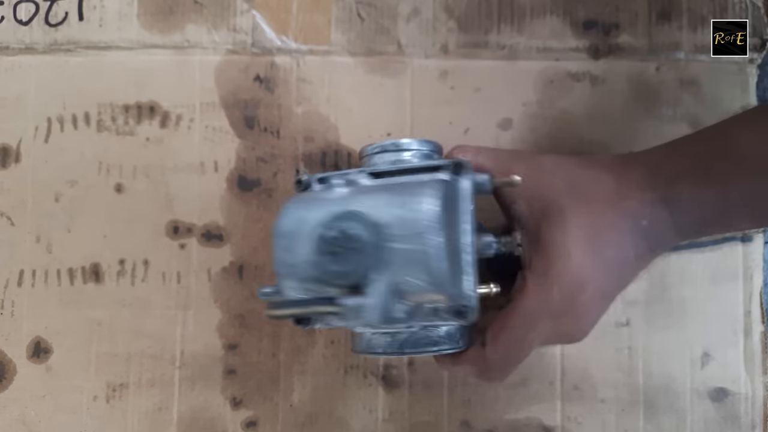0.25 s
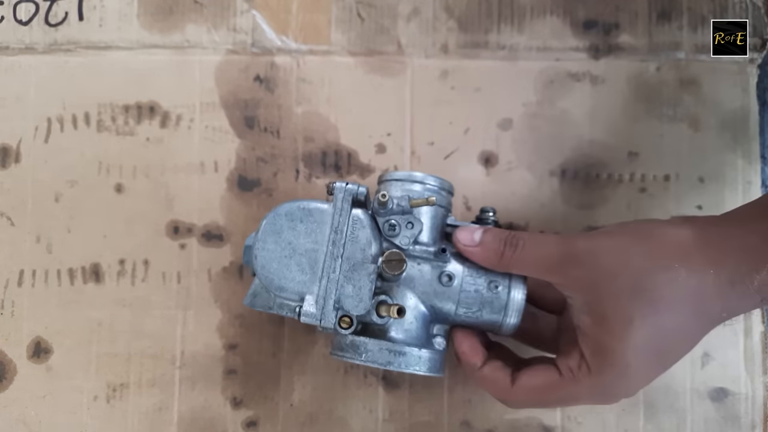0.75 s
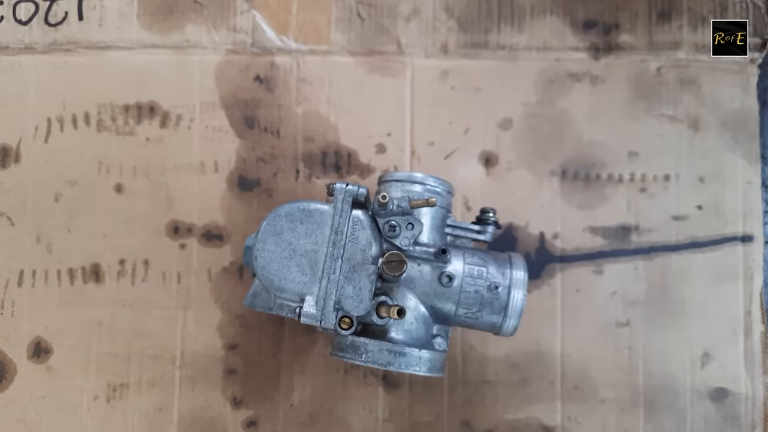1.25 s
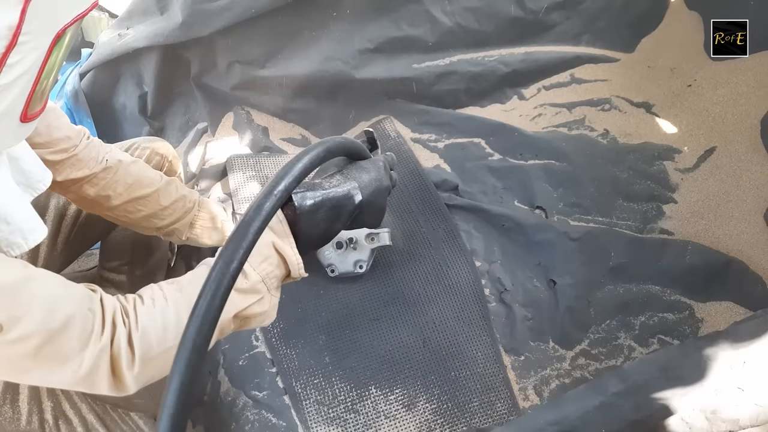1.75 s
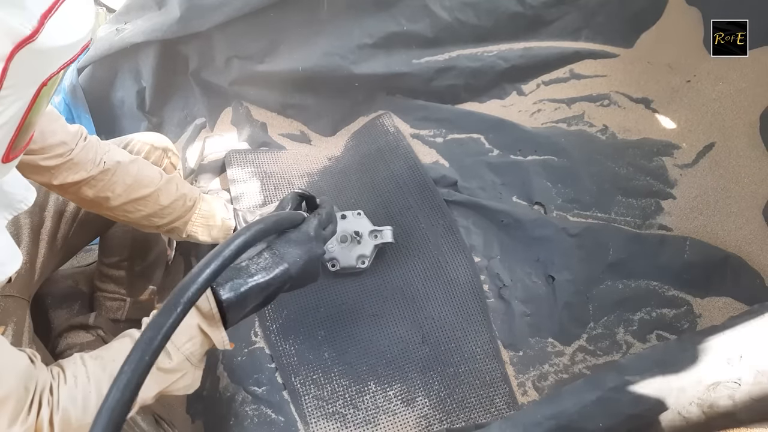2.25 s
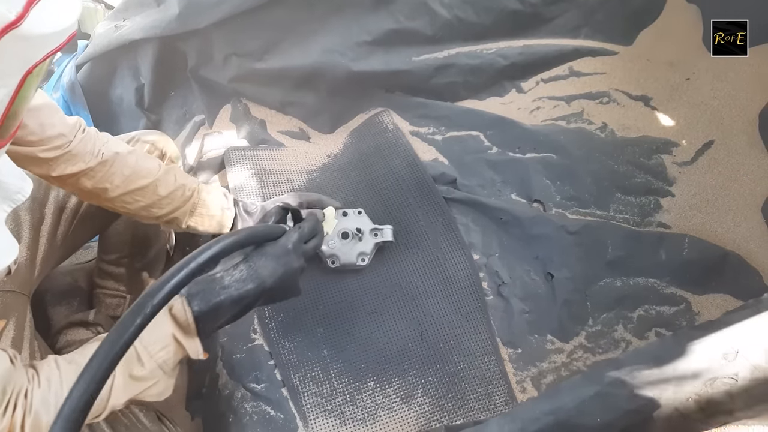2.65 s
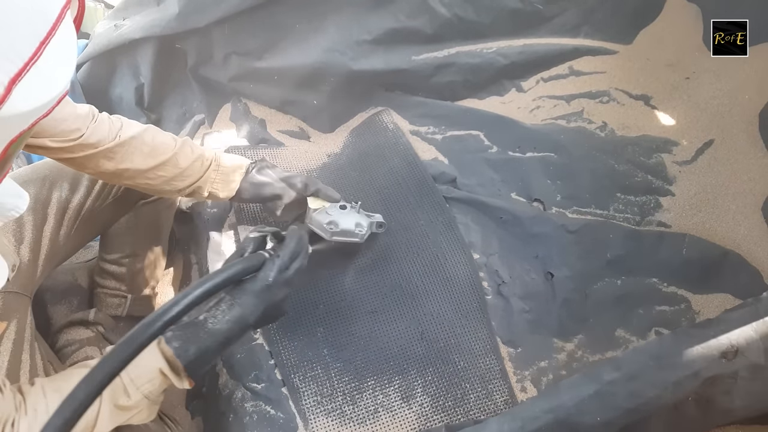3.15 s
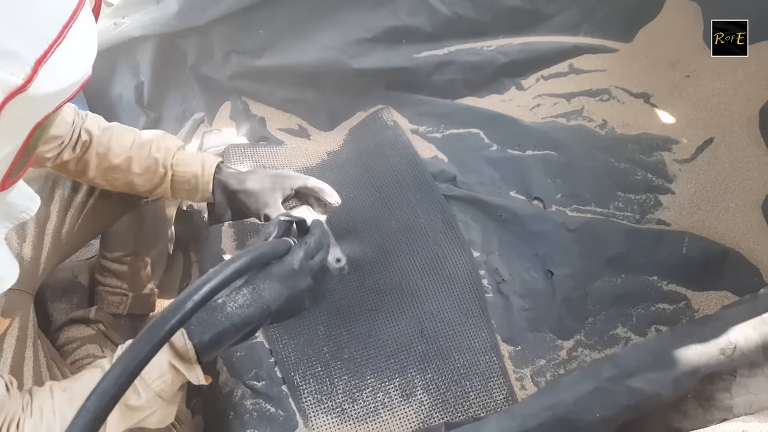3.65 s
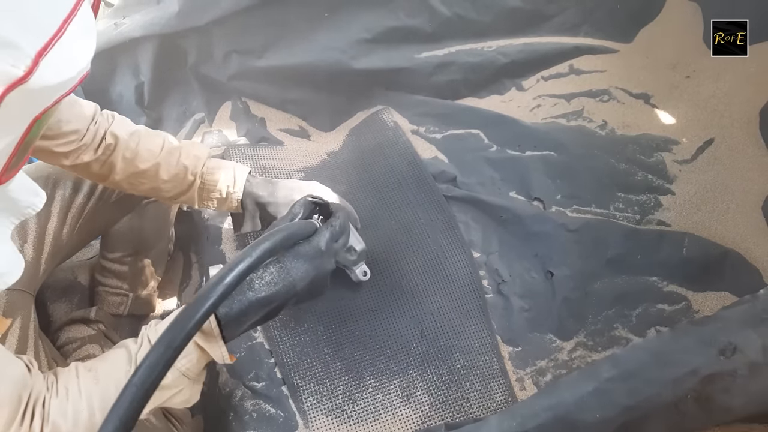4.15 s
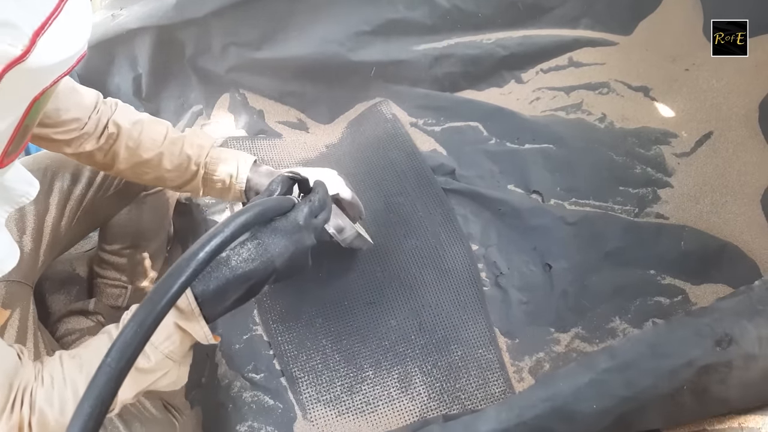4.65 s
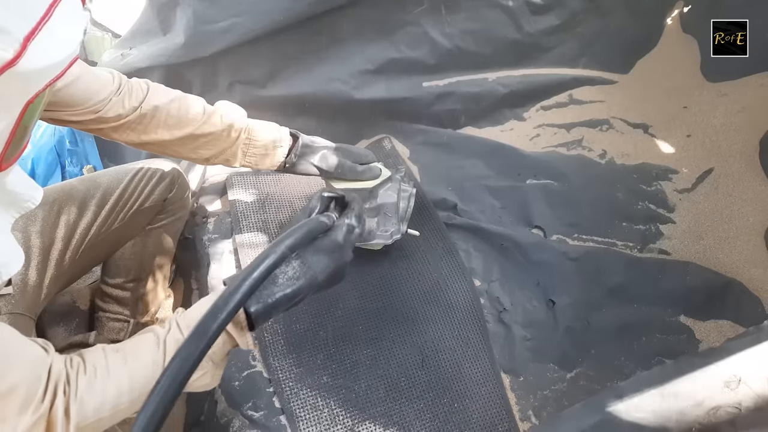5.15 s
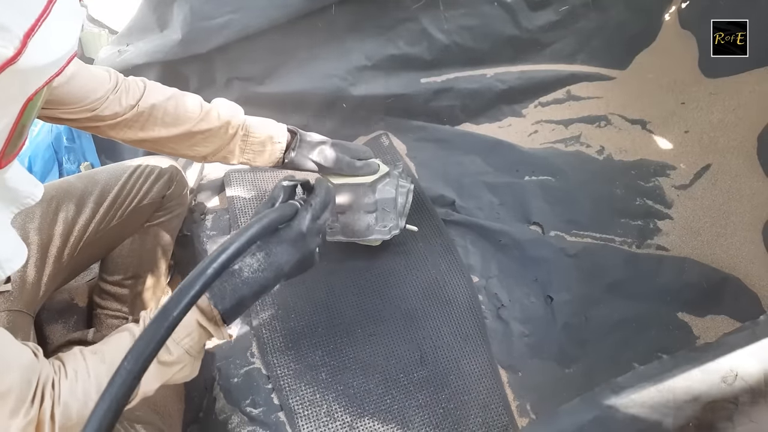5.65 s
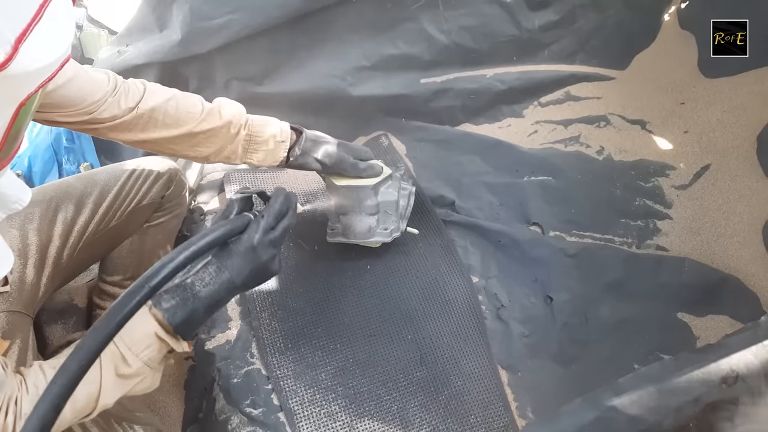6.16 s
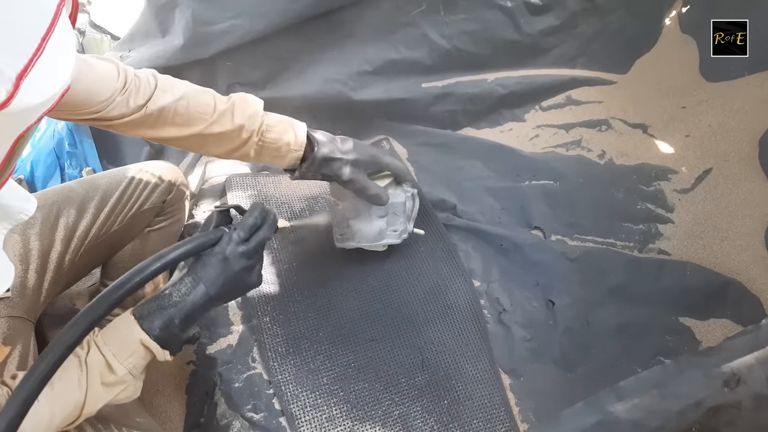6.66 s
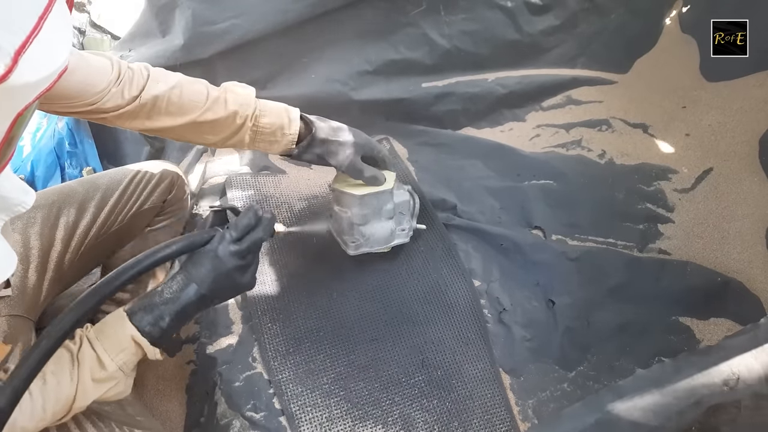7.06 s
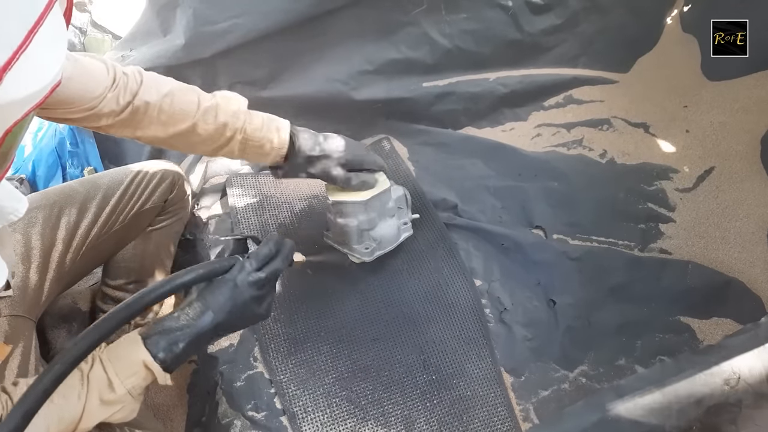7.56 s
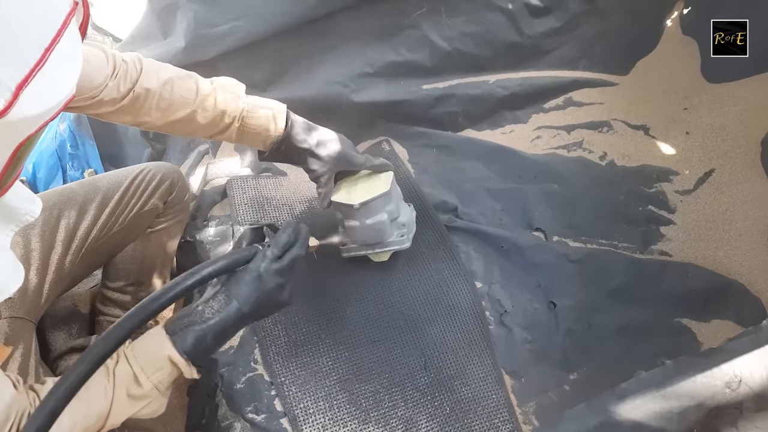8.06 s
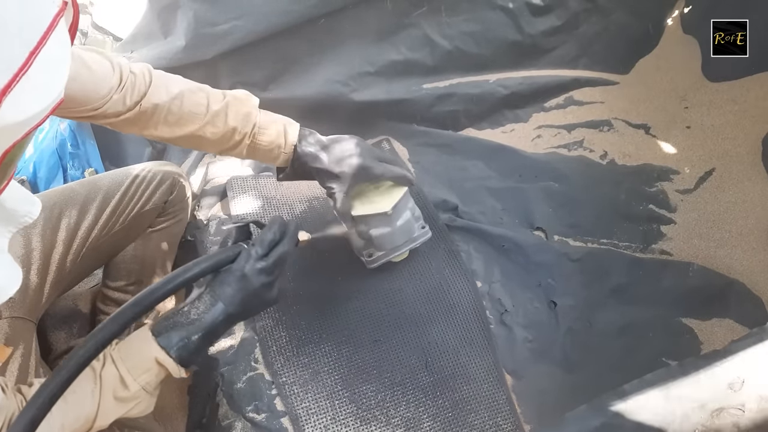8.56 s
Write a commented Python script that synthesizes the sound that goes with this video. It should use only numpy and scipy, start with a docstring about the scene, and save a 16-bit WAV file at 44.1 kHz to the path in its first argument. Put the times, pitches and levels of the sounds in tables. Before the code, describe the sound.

A metal engine part is turned and set down on cardboard with light knocks and scrapes, while faint chirps, a thin insect buzz and a distant motor hum fill an open shed. After about a second and a half, a sandblaster cuts in abruptly, close and loud. Its bright hiss continues to the end, shifting in tone as grit sweeps over metal and a mat. Stray grains pop against the left side of the microphone.

```python
"""In an open shed, a metal casting is turned and laid down on cardboard. It knocks and rubs, while
a far motor hums, something chirps and an insect buzzes. After 1.6 seconds the scene cuts to a
blasting nozzle: a jet of air hisses, and the grit it carries rings the casting and drums on the mat.
Stray grains pop on the left microphone port (its small opening), and the gain control, an automatic
volume knob, turns the sound down for a moment after loud pops."""
import sys
import numpy as np
from scipy import signal
from scipy.fft import rfft, irfft, next_fast_len
from scipy.io import wavfile
from scipy.ndimage import uniform_filter1d, map_coordinates

SR = 44100
rng = np.random.default_rng(int(sys.argv[2]) if len(sys.argv) > 2 else 0)


def transcribe(signal):
    """Save signal, clipped to [-1, 1], as a 16-bit WAV file at the path in sys.argv[1]."""
    frames = np.atleast_2d(signal).T
    limited = np.clip(frames, -1, 1)
    pcm = np.round(limited * 32767).astype(np.int16)
    wavfile.write(sys.argv[1], SR, pcm)


N = 388593
TIME_S = np.arange(N) / SR
CUT_S = 1.601  # the shed ends and the blasting begins
PAN = np.array([[.5], [-.5]])  # shares a left-over-right level between the two channels

# Levels in the tables set the balance; the functions add further gains.
# Tone colours of the air jet's three bands: pitch_hz, level_db
JET_COLOUR = [(2800, -5), (3800, -2), (4500, 1), (4900, 0), (5550, -0.5), (5850, 1.5), (6400, 0.5),
              (7200, -1.5), (8500, -13.5)]
NOZZLE_COLOUR = [(6500, -12), (7400, -2), (8500, 4), (9800, -1), (11500, -15)]
FINE_COLOUR = [(9000, -2.5), (10500, 6), (11500, 7.5), (13000, 5.5), (14500, 4), (15700, -0.5)]
# How strong those bands are: time_s, jet_db, nozzle_db, fine_db
AIR_LEVELS = [(1.62, -31.5, -28.5, -27.5), (2.44, -30.5, -30.5, -26.5), (2.92, -30.5, -29, -26.5),
              (3.22, -31, -35.5, -27), (3.3, -27.5, -33, -26.5), (3.5, -31.5, -31, -28),
              (3.7, -29.5, -28, -26.5), (3.74, -26.5, -30, -20.5), (3.8, -30.5, -33, -27.5),
              (4.08, -32, -31.5, -25), (4.62, -29.5, -31, -27.5), (5.74, -30, -32, -26),
              (5.92, -29.5, -29, -25.5), (6.48, -30.5, -31.5, -28.5), (6.54, -27, -32, -26),
              (6.62, -32, -32, -29.5), (6.78, -28.5, -30, -27), (8.24, -29.5, -31, -26),
              (8.78, -29.5, -27.5, -26), (8.8, -31, -31, -29)]
# Extra lift of the fine hiss above about 13 kHz: time_s, lift_db
TOP_LIFT = [(1.6, 4.5), (2.6, 3), (3.5, 5), (4.1, 1.5), (4.95, 6.5), (5.7, 3), (8.8, 2.5)]
# Where the blasting sits between the ears: time_s, left_over_right_db
BLAST_PAN = [(1.6, -1), (4.1, -1.2), (6.5, 0), (8.8, 0)]
# The blasting briefly dips in volume, mostly just after loud pops: time_s, width_s, change_db
BLAST_DIPS = [(3.75, 0.027, -7), (6.3, 0.015, -0.5), (6.47, 0.022, -1.5), (6.64, 0.026, -1),
              (7.18, 0.014, -3.5), (7.77, .03, -1), (8.31, 0.018, -3.5)]
# Tone colours of grit on metal, grit on the mat and the low rumble: pitch_hz, level_db
METAL_COLOUR = [(900, -9.5), (1200, -9), (1450, -1), (1900, -0.5), (2450, -4), (3000, -4.5), (4000, -5.5),
                (4800, -11.5)]
MAT_COLOUR = [(380, -55), (440, -5.5), (510, -0.5), (700, 1), (950, -1), (1100, -6.5), (1350, -5.5),
              (1700, -25)]
RUMBLE_COLOUR = [(20, 15.5), (80, -10), (150, -4.5), (250, -0.5), (420, 0.5), (520, -56)]
# Pitches that the grit sets ringing in the casting and the mat: pitch_hz, width_hz, strength_db
CASTING_PEAKS = [(1500, 140, -4), (2050, 140, -3), (2287, 130, -.5), (2690, 130, 0), (3050, 130, -1.5),
                 (3390, 160, 0), (3940, 120, -5)]
MAT_PEAKS = [(508, 120, -1.5)]
# Slow changes in where the stream lands: time_s, metal_db, mat_db
GRIT_LEVELS = [(1.78, -32, -39), (2.8, -30, -38), (3.38, -27, -43), (3.77, -30, -37.5), (4.81, -34, -34.5),
               (5.1, -32, -36.5), (6.12, -35, -35.5), (6.47, -33.5, -38.5), (7.16, -33.5, -36),
               (7.59, -31, -36), (7.96, -32.5, -34.5), (8.45, -33.5, -38), (8.8, -33.5, -36)]
# Lifts as the stream sweeps across: time_s, width_s, metal_db, large_hollow_db, small_hollow_db, mat_db
STREAM_SWEEPS = [(1.67, 0.078, 5.5, 7, -4, 2), (1.93, 0.13, 2, 12, 7, -1), (2.17, 0.074, -1, .1, -3, 2.5),
                 (2.5, 0.081, 0.5, 18, -3, 4.5), (2.59, 0.04, 0.5, 8.1, 5, -3), (2.99, 0.16, -1, 4, 12, 4),
                 (3.08, 0.057, 0.5, 6.2, 6, -3), (3.17, 0.03, 1.5, 12, 13, -2),
                 (3.27, 0.051, 2, 8, 10.5, 1), (3.34, 0.1, -2, 12, 16.5, 4.5), (3.55, 0.13, 1, 9.4, 16, 1),
                 (3.7, 0.016, 4, 1, 8, -1), (3.81, 0.04, 3, 6.8, 14, 1), (3.92, 0.077, 1, 6.1, 8, -3),
                 (4.03, 0.05, 4.5, 12, -2, -2), (4.21, 0.063, 6, 13, 2, -3.5),
                 (4.32, 0.056, 3.2, 8, -1, -5), (4.44, 0.053, 4.5, 14, 2, -4.5),
                 (4.6, 0.065, 4, 10, 2, 0.5), (4.74, 0.15, 5, 5.6, 7, -5.5), (4.9, 0.095, 3, 13, -7, 0.5),
                 (5.55, 0.096, 1, .1, 6, -3), (5.78, 0.054, 4.5, 8.6, -2, 2.5),
                 (6.02, 0.074, 8, 6.3, 0, -1), (6.27, 0.044, 3, 8.1, -4, 3.5), (6.53, 0.028, 3, 13, 13, 0),
                 (6.78, 0.23, 1, 1, 1, 1.5), (7.04, 0.023, 3, 9, -1, 7), (7.24, 0.038, 1.5, 10, -7, 4.5),
                 (7.34, 0.022, 2.5, 9.9, -4, -0.5), (7.7, 0.076, 0, 8.4, 5, -3),
                 (8.45, 0.033, 3, 17.5, 3, 5)]
# The stream glances off an edge and flares up: time_s, width_s, pitch_hz, width_hz, level_db
EDGE_FLARES = [(1.69, .05, 2330, 300, -34), (1.9, .03, 2270, 250, -33), (2.0, .03, 2300, 400, -32),
               (2.07, 0.028, 2700, 250, -38), (3.1, 0.044, 3220, 400, -29), (3.3, 0.064, 3400, 500, -29),
               (3.3, .04, 2050, 250, -31), (3.44, .03, 2250, 200, -34), (3.48, 0.049, 3300, 600, -31),
               (3.51, 0.044, 1500, 200, -35), (3.64, 0.057, 4020, 600, -29.5),
               (3.83, 0.039, 2030, 250, -34), (4.02, 0.036, 3950, 500, -30.5), (4.87, 0.04, 2100, 450, -31),
               (5.56, .025, 3530, 400, -34), (5.77, 0.047, 1510, 200, -38), (6.03, 0.051, 3570, 500, -31),
               (6.04, 0.034, 4250, 400, -30), (6.53, 0.024, 1520, 300, -30), (6.54, 0.031, 3700, 600, -29),
               (7.01, .03, 4000, 300, -38), (7.015, 0.016, 604, 250, -30), (7.043, 0.01, 840, 250, -30),
               (7.22, 0.025, 520, 150, -35), (7.233, .012, 785, 150, -29), (7.69, 0.026, 4100, 400, -32),
               (8.26, 0.028, 4080, 300, -32), (8.34, 0.072, 3320, 200, -36), (8.44, .04, 3800, 400, -33),
               (8.46, .04, 2830, 300, -39), (8.62, 0.034, 1550, 250, -33)]
# Large hollow, small hollow and nozzle whistle: pitch_hz, width_hz, flutter_db, flutters_per_s
HOLLOWS = [(1690, 120, 1.5, 27), (2750, 380, 2, 40), (4660, 70, 2.5, 30)]
# The nozzle's faint whistle grows louder in bursts: time_s, width_s, lift_db
WHISTLE_BURSTS = [(4.22, .06, 5), (5.8, .04, 8), (6.25, .06, 6), (6.76, .08, 8), (6.9, .1, 11),
                  (7.06, .09, 9), (7.24, .09, 13), (7.5, .07, 11), (7.66, .07, 11), (7.98, .07, 10),
                  (8.45, .1, 9), (8.73, .05, 8)]
# Grains hit the left port: time_s, thump_db, tick_db
GRAIN_HITS = [(1.724, -50, -3.5), (2.106, -20, -3), (2.276, -53, -10), (2.491, -47, -12), (2.74, -51, -7),
              (2.903, -47, -4), (3.0778, -39, -0.5), (3.114, -26, -10), (3.133, -17, -19),
              (3.1987, -13, -1.5), (3.731, -20, -13), (4.5201, -45, -17), (4.563, -45, 3.5),
              (4.683, -46, -6), (4.8875, -22, -2), (5.9174, -42, 0), (6.255, -44, 0.5), (6.287, 1, -5),
              (6.8113, -21, -19), (6.9803, -48, -7), (7.154, -38, -8), (7.175, -14.5, -8),
              (7.193, -38, -1.5), (7.28, -47, -11), (7.345, -44, -5), (7.3816, -1.5, -5.5),
              (7.5916, -20, -14), (7.6892, -17, -12), (8.133, -32, -8), (8.3042, -19, -11),
              (8.3182, -6, -2), (8.5897, -19, -9), (8.7485, -48, -10)]

# The casting touches the cardboard; each touch favours one pitch in the casting and one in the board:
# start_s, board_db, casting_db, crack_db, casting_pitch_hz, board_pitch_hz
TOUCHES = [(0.059, -41, -64, -55, 700, 300), (0.31, -47, -60, -50, 700, 300),
           (0.378, -67, -52, -50, 2400, 300), (0.4119, -24.5, -38, -40, 850, 400),
           (0.417, -22, -47, -55, 1000, 249), (.428, -29, -36, -53, 660, 400),
           (.441, -38, -33.5, -62, 660, 250), (.455, -36, -44, -62, 800, 250),
           (0.529, -56, -35, -47, 1450, 500), (.533, -58, -36, -56, 1200, 400),
           (0.5565, -38, -40, -58, 850, 500), (.646, -44, -38, -55, 1000, 550),
           (0.6643, -20.5, -29, -28, 1000, 450), (0.673, -30, -47, -50, 1000, 250),
           (0.688, -26, -35, -40, 1000, 350), (.694, -28, -42, -55, 800, 230),
           (0.729, -37, -43, -46, 780, 620), (0.7696, -27.5, -35.5, -35.5, 1320, 590),
           (.775, -42, -55, -60, 750, 220), (.894, -47, -46, -55, 1700, 300),
           (0.937, -67, -55, -57, 1500, 300), (1.0946, -44, -33, -43, 1430, 700)]
# Notes of the knocked cardboard and casting: pitch_hz, level_db, ring_s (time to fade by 60 dB)
BOARD_NOTES = [(165, -17, 0.049), (246, 2.5, 0.055), (418, -0.5, 0.057), (600, 4, 0.018)]
CASTING_NOTES = [(655, 1, 0.09), (790, -3, 0.035), (1000, 0, 0.07), (1175, 0, 0.04), (1390, -2, .03),
                 (1720, 2, 0.022), (2400, 0, .018)]
# The casting slides over the cardboard: peak_s, rise_s, fall_s, thud_db, rub_db, scuff_db, rustle_db
SLIDES = [(0.056, 0.017, 0.11, -56, -55, -55, -51), (0.296, 0.064, 0.076, -55.5, -57, -51.5, -46),
          (0.416, 0.0033, 0.079, -33.5, -48, -69, -68), (0.528, .035, 0.11, -48, -51, -56, -50),
          (0.61, 0.038, 0.16, -49, -58, -47, -66), (0.664, 0.1, 0.037, -43, -43, -40, -47),
          (0.695, 0.023, .04, -42, -47, -61, -70), (0.776, 0.16, 0.13, -43, -56, -63, -75),
          (0.93, 0.075, 0.033, -55, -58, -61, -59), (1.098, 0.0066, 0.05, -51, -53, -57, -76),
          (1.24, 0.051, 0.047, -57, -56, -69, -84), (1.482, 0.044, 0.11, -55, -57, -68, -61),
          (1.59, 0.06, .05, -53.5, -80.5, -75.5, -63)]
# The quiet between slides: thud_db, rub_db, scuff_db, rustle_db
QUIET_DB = [-59.5, -65.5, -74, -76]
# Tone colours of the four sliding noises, low to high: pitch_hz, level_db
THUD_COLOUR = [(50, -10), (120, 1), (200, 5), (400, 0.5), (900, -6.5), (1500, -50)]
RUB_COLOUR = [(600, -26), (900, 6.5), (1300, 11), (2000, 9), (2800, 2), (3600, -8)]
SCUFF_COLOUR = [(2000, -22), (3000, 8), (4500, 4), (7000, 1), (10000, -15), (12500, -29)]
RUSTLE_COLOUR = [(7000, -6), (10000, 1), (12000, -4), (16500, -2)]
# Nearby chirps and thin squeaks:
# start_s, length_s, first_pitch_hz, held_pitch_hz, level_db, swell_share (of the length), wobble_hz
CALLS = [(0.028, .045, 1130, 1220, -51, .5, 15), (0.068, .06, 1330, 1330, -55, .2, 70),
         (0.225, .055, 12000, 12000, -60, .6, 45), (0.245, .042, 1950, 2190, -45, .5, 30),
         (0.225, .05, 13300, 13400, -64, .5, 45), (0.225, .04, 1350, 1480, -62, .4, 60),
         (0.255, .07, 13900, 14800, -58, .4, 45), (0.316, .011, 2200, 2080, -39, .45, 20),
         (0.326, .036, 1950, 2050, -50, .2, 45), (0.378, .012, 12600, 12400, -60, .3, 150),
         (0.385, .025, 9600, 9600, -66, .3, 45), (0.502, .045, 10000, 9950, -62, .4, 90),
         (0.515, .03, 11600, 11400, -65, .4, 120), (0.575, .035, 10100, 10000, -64, .6, 90),
         (0.76, .015, 13800, 13400, -62, .5, 150), (1.42, .045, 13700, 14000, -73, .6, 60),
         (1.478, .02, 11900, 11700, -65, .4, 90), (0.487, .042, 1980, 2200, -56, .5, 40),
         (0.564, .066, 1385, 1390, -43, .55, 5), (0.665, .06, 10000, 9800, -57, .2, 130),
         (0.705, .06, 2370, 2370, -63, .5, 25), (0.78, .055, 1720, 1730, -60, .4, 25),
         (0.84, .065, 1790, 1990, -62, .7, 20), (0.905, .045, 12500, 11900, -65, .3, 45),
         (0.915, .05, 2150, 2145, -61, .45, 20), (0.93, .04, 1180, 1190, -64, .4, 20),
         (1.05, .05, 12100, 12350, -68, .4, 45), (1.072, .03, 1396, 1396, -53, .4, 30),
         (1.192, .05, 1130, 1420, -46, .7, 8), (1.196, .02, 1150, 1270, -53, .3, 8),
         (1.23, .078, 1430, 1450, -49, .55, 12), (1.196, .045, 2300, 2450, -57, .45, 50),
         (1.195, .04, 4700, 4900, -68, .3, 45), (1.35, .11, 2480, 2420, -69, .6, 30),
         (1.455, .035, 1600, 1760, -62, .6, 40), (1.222, .045, 2900, 2950, -66, .5, 30),
         (1.45, .15, 1225, 1220, -65, .4, 10), (1.455, .04, 13100, 11700, -69, .5, 45),
         (1.54, .06, 2420, 2430, -66, .5, 15), (1.57, .03, 12700, 13100, -65, .5, 45)]
# Lower callers sit left, higher ones right: pitch_hz, left_over_right_db
CALL_PAN = [(1200, 9), (1600, 16), (2100, -7.5), (12000, -11)]
# Tones of the far motor: pitch_hz, level_db
MOTOR_TONES = [(151.5, -49), (210, -54.5), (285, -59.5), (305, -66), (339, -62), (400, -67)]
# The hum swells: time_s, change_db
MOTOR_SWELL = [(0, -33), (0.6, -19), (1.0, -13), (1.3, -5), (1.6, -6)]
# Tone colour of the insect: pitch_hz, level_db
INSECT_COLOUR = [(7000, -14), (8000, 0), (9000, 0), (10300, 4), (11000, -7), (11600, -30)]
# The insect's buzzes: start_s
BUZZ_STARTS = [0.0, .148, .29, .428, .575, .718, .872, 1.018, 1.158, 1.3, 1.437, 1.575]

# How alike the noise is in both ears: pitch_hz, likeness (0 unrelated, 1 the same)
BLAST_ALIKE = [(60, 0.26), (99, 0.23), (160, 0.62), (270, 0.63), (450, 0.95), (740, 0.92), (1220, 0.77),
               (2010, 1), (3330, 0.51), (5500, 0.3), (9080, 0.51), (15000, 0.23)]
SHED_ALIKE = [(60, 0.98), (180, 0.89), (550, 0.69), (1650, 0.21), (4970, 0.11), (15000, 0.04)]
# Which side the noise leans to: pitch_hz, left_over_right_db
BLAST_BALANCE = [(60, 14.5), (87, -1), (130, -1.5), (180, -2), (260, 0.5), (380, 0), (550, 1.5), (790, 1.5),
                 (1140, 5), (1650, 3.5), (2380, 1.0), (3440, 1.5), (4970, 1), (7180, -1.5), (10400, -0.5),
                 (15000, 3)]
SHED_BALANCE = [(60, 8), (180, 4), (550, 3), (1650, 1), (4970, -6), (15000, -4)]
# How far the left wave runs ahead of the right: pitch_hz, lead_radians
BLAST_LEAD = [(0, -0.46), (1120, 0.28), (2070, -0.77), (2410, -1.4), (3010, -0.56), (3270, 0.52),
              (4310, -0.95), (4740, -1.1), (5860, -0.96), (6370, 0.37), (8960, -0.33), (11800, 1),
              (12800, -0.59), (14000, -0.2), (15000, -0.8), (16500, -2.3)]


def blasting():
    """Air and grit leave the nozzle in uneven surges; the volume also dips briefly at set times."""
    stream = air_jet() + grit() + rumble()
    breath = hiss([(300, 0), (16000, 0)], flicker_db=0, rate=1, bands=1)
    stream = stream + edge_flares(breath) + hollows(breath)
    surge_db = 0.79 * drift(51) + 0.36 * drift(11.6)
    return stream * from_db(surge_db + bumps(BLAST_DIPS)[0] + PAN * curves(BLAST_PAN)[0])


def air_jet():
    """Rushing air hisses in three streaky bands; the very top of the hiss rises and falls as well."""
    jet_db, nozzle_db, fine_db = curves(AIR_LEVELS)
    fine = hiss(FINE_COLOUR, flicker_db=2.3, rate=4.4, bands=40)
    top = signal.sosfiltfilt(signal.butter(3, 13200, "high", fs=SR, output="sos"), fine)
    fine = fine + (from_db(curves(TOP_LIFT)[0]) - 1) * top
    jet = hiss(JET_COLOUR, flicker_db=2.3, rate=5.5, bands=40)
    nozzle = hiss(NOZZLE_COLOUR, flicker_db=2.4, rate=6, bands=30)
    return from_db(jet_db) * jet + from_db(nozzle_db) * nozzle + from_db(fine_db) * fine


def grit():
    """Countless grains blur into a noise that rings the casting and drums on the mat."""
    metal_db, mat_db = curves(GRIT_LEVELS)
    metal_lift_db, _, _, mat_lift_db = bumps(STREAM_SWEEPS)
    metal = hiss(METAL_COLOUR, flicker_db=2.2, rate=8, bands=40, peaks=CASTING_PEAKS, peak_db=2.5)
    mat = hiss(MAT_COLOUR, flicker_db=1.48, rate=10, bands=6, peaks=MAT_PEAKS)
    return from_db(metal_db + metal_lift_db) * metal + from_db(mat_db + mat_lift_db) * mat


def edge_flares(breath):
    """Where the stream glances off an edge, one narrow band of its noise swells and sinks."""
    out = np.zeros((2, N))
    for time_s, width_s, hz, width_hz, db in EDGE_FLARES:
        span = slice(int((time_s - 2 * width_s) * SR), int((time_s + 2 * width_s) * SR))
        bell = np.exp(-((TIME_S[span] - time_s) / width_s) ** 2)
        out[:, span] += from_db(db) * bell * unit_level(narrow_band(breath[:, span], hz, width_hz))
    return out


def hollows(breath):
    """Blown air makes two hollows in the casting, and the nozzle, each flutter near its own pitch."""
    _, large_db, small_db, _ = bumps(STREAM_SWEEPS)
    levels_db = large_db - 48.5, small_db - 46, bumps(WHISTLE_BURSTS)[0] - 46.5
    out = np.zeros((2, N))
    for db, (hz, width_hz, flutter_db, rate) in zip(levels_db, HOLLOWS):
        note = narrow_band(breath, hz, width_hz) * from_db(flutter_db * drift(rate))
        out += from_db(db) * unit_level(note)
    return out


def rumble():
    """A low, wavering noise under the blasting slowly grows louder."""
    level_db = -47.5 + 0.39 * TIME_S + 1.2 * drift(4.3)
    return from_db(level_db) * hiss(RUMBLE_COLOUR, flicker_db=0.49, rate=21, bands=3)


def grain_pops():
    """A grain hits the left port: a sharp tick, a brief hollow ring and a short low thump."""
    time_s, thump_db, tick_db = np.transpose(GRAIN_HITS)
    thump = ring(clicks(time_s + 0.00017, thump_db + 5.5), hz=206, ring_s=0.0056)
    hits = clicks(time_s, tick_db + 14)
    tick = filtered(hits, "low", 3200) + from_db(-22.5) * ring(hits, hz=660, ring_s=0.0026)
    tick = -filtered(tick, "high", 560, order=3)  # minus: the push is inward
    return thump * from_db([[0], [-34]]) + tick * from_db([[0], [-12]])  # much weaker on the right


def knocks():
    """Each touch thumps the cardboard, rings the casting and adds a short crack."""
    start_s, board_db, casting_db, crack_db, casting_hz, board_hz = np.transpose(TOUCHES)
    notes = BOARD_NOTES + CASTING_NOTES
    chance_db = rng.normal(0, 1.5, (len(start_s), len(notes)))
    ringing = np.zeros(N)
    for k, (hz, db, ring_s) in enumerate(notes):
        # A note is weaker for each octave it lies from the pitch that the touch favours.
        if k < len(BOARD_NOTES):
            blow_db = board_db - 10 * abs(np.log2(hz / board_hz))
        else:
            blow_db = casting_db - 20 * abs(np.log2(hz / casting_hz))
        blows = clicks(start_s, blow_db + db + chance_db[:, k])[:2 * SR]
        ringing[:2 * SR] -= (-1) ** k * ring(blows, hz, ring_s)  # every other note is flipped
    decay = np.exp(-1 / (0.0024 * SR))  # a crack dies away in a few milliseconds
    crack_level = signal.lfilter([1], [1, -decay], clicks(start_s, crack_db) + 1e-18)
    crack = unit_level(filtered(rng.standard_normal((2, N)), "band", [1200, 7000]))
    return filtered(ringing + 1e-18, "low", 3200) + crack_level * crack


def rubbing():
    """Metal slides on cardboard: with each stroke, four soft noises swell out of the quiet and sink."""
    layers = [shed_hiss(THUD_COLOUR, flicker_db=7.2, rate=8.6),
              shed_hiss(RUB_COLOUR, flicker_db=5.5, rate=15.6),
              shed_hiss(SCUFF_COLOUR, flicker_db=1.7, rate=17),
              shed_hiss(RUSTLE_COLOUR, flicker_db=3.2, rate=15)]
    quiet_db = np.array(QUIET_DB)[:, None]
    level_db = quiet_db + np.zeros(N)
    for peak_s, rise_s, fall_s, *peak_db in SLIDES:
        span = slice(int(max(peak_s - rise_s, 0) * SR), int((peak_s + fall_s) * SR))
        swell = np.interp(TIME_S[span], [peak_s - rise_s, peak_s, peak_s + fall_s], [0, 1, 0])
        slide_db = quiet_db + swell * (np.array(peak_db)[:, None] - quiet_db)
        level_db[:, span] = np.maximum(level_db[:, span], slide_db)
    return sum(from_db(db) * layer for db, layer in zip(level_db, layers))


def chirps():
    """Rough, unsteady whistles glide to a held pitch, swell and fade, each off to one side."""
    glide_share, rise_db, fade_db = .6, 14, 11
    wobble, flutter_db = drift(90), 3 + 1.6 * drift(120)
    out = np.zeros((2, N))
    for start_s, length_s, first_hz, held_hz, db, swell_share, wobble_hz in CALLS:
        span = slice(int(start_s * SR), int((start_s + length_s) * SR))
        progress = np.linspace(0, 1, span.stop - span.start)
        hz = np.interp(progress, [0, glide_share], [first_hz, held_hz]) + wobble_hz * wobble[span]
        phase = 2 * np.pi * np.cumsum(hz) / SR + rng.uniform(0, 1.1, (2, 1))
        shape_db = np.interp(progress, [0, swell_share, 1], [-rise_db, 0, -fade_db])
        level_db = db + shape_db + flutter_db[span] + PAN * at_pitch(CALL_PAN, held_hz)
        soft_ends = np.clip(np.minimum(progress, 1 - progress) * length_s / 0.003, 0, 1)
        out[:, span] += soft_ends * from_db(level_db) * np.sin(phase)
    return out


def motor_hum():
    """A far motor hums in a few low tones, each wavering in loudness and pitch."""
    hum = np.zeros(N)
    for hz, db in MOTOR_TONES:
        level_db = db + 5 + 2.5 * drift(9)
        pitch_hz = hz + 3 * drift(6.5)
        hum += from_db(level_db) * np.sin(2 * np.pi * np.cumsum(pitch_hz) / SR)
    return hum * from_db(curves(MOTOR_SWELL)[0])


def insect():
    """An insect's high buzz starts quickly and fades, about seven times a second."""
    rise_s, fade_s = 0.018, 0.041
    latest = np.searchsorted(BUZZ_STARTS, TIME_S, "right") - 1
    age_s = TIME_S - np.array(BUZZ_STARTS)[latest]
    throb = uniform_filter1d(np.exp(-age_s / fade_s), size=int(rise_s * SR))
    return from_db(-57) * throb * shed_hiss(INSECT_COLOUR, flicker_db=2, rate=11)


def hiss(colour, flicker_db, rate, bands, peaks=(), peak_db=0,
         stereo=(BLAST_ALIKE, BLAST_BALANCE, BLAST_LEAD), length=N):
    """Stereo noise of a given tone colour, whose bands each flicker about rate times a second."""
    size = next_fast_len(length)
    hz = np.maximum(np.arange(size // 2 + 1) * SR / size, 1)
    power = from_db(2 * at_pitch(colour, hz)) * (hz > colour[0][0])
    power *= 1 + sum(from_db(2 * (db + peak_db)) / (1 + (2 * (hz - peak_hz) / width_hz) ** 2) ** 2
                     for peak_hz, width_hz, db in peaks)
    # Both ears share one noise; a second is added on the left and taken away on the right.
    alike, balance_db, lead = (at_pitch(table, hz) for table in stereo)
    shared, apart = rfft(rng.standard_normal((2, size))) * np.sqrt(power)
    spectrum = np.sqrt(1 + alike) * shared + np.sqrt(1 - alike) * apart * np.sign(PAN)
    spectrum *= from_db(PAN * balance_db)
    spectrum[0] *= np.exp(1j * lead)
    # Cut the noise into short frames and turn each band up and down by chance.
    frame_hz, frame_s, frames = signal.stft(irfft(spectrum, size), SR, nperseg=512)
    low_hz, high_hz = colour[0][0], colour[-1][0]
    band = np.clip(np.log((frame_hz + 1) / low_hz) / np.log(high_hz / low_hz), 0, 1) * (bands - 1)
    grid = np.meshgrid(band, 2 * rate * frame_s, indexing="ij")
    flicker = map_coordinates(rng.standard_normal((bands, 1000)), grid, order=1)
    _, noise = signal.istft(frames * from_db(flicker_db * flicker), SR, nperseg=512)
    out = np.zeros((2, N))
    out[:, :length] = noise[:, :length]
    return out / np.sqrt(np.mean(out[:, :length].mean(0) ** 2))


def shed_hiss(colour, flicker_db, rate):
    """Two seconds of flickering noise, spread between the ears as in the shed."""
    no_lead = [(20, 0), (20000, 0)]
    return hiss(colour, flicker_db, rate, bands=7, stereo=(SHED_ALIKE, SHED_BALANCE, no_lead),
                length=2 * SR)


def ring(hits, hz, ring_s):
    """Each click starts a pure tone that fades by 60 dB in ring_s seconds."""
    decay, step = 1000 ** (-1 / (ring_s * SR)), 2 * np.pi * hz / SR
    return signal.lfilter([0, np.sin(step)], [1, -2 * decay * np.cos(step), decay ** 2], hits + 1e-18)


def clicks(times_s, levels_db):
    """Silence with a single click at each given time."""
    out = np.zeros(N)
    out[np.round(times_s * SR).astype(int)] = from_db(levels_db)
    return out


def drift(rate):
    """A smooth random wander of typical size 1, changing about rate times a second."""
    hop, warm_up = 40, 2000
    memory = np.exp(-2 * np.pi * hop * rate / SR)
    noise = rng.standard_normal(N // hop + warm_up + 2)
    slow = signal.lfilter([1], [1, -2 * memory, memory ** 2], noise)[warm_up:]
    return np.interp(np.arange(N) / hop, np.arange(len(slow)), unit_level(slow))


def bumps(rows):
    """Each row makes a bell-shaped bump in time; gives one summed curve for each level column."""
    t = np.arange(0, N + 64, 64) / SR
    time_s, width_s, *columns = np.transpose(rows)
    bells = np.exp(-((t[:, None] - time_s) / width_s) ** 2)
    return curves(np.column_stack([t] + [bells @ column for column in columns]))


def curves(rows):
    """Joins a table's points in time with straight lines, one curve for each level column."""
    time_s, *columns = np.transpose(rows)
    return [np.interp(TIME_S, time_s, column) for column in columns]


def at_pitch(rows, hz):
    """Reads a table between its pitches, with every octave equally wide."""
    pitches_hz, values = np.transpose(rows)
    return np.interp(np.log(hz), np.log(pitches_hz + 1), values)


def filtered(sound, keep, hz, order=2):
    """Keeps the "low" part, the "high" part or a "band" of a sound."""
    return signal.sosfilt(signal.butter(order, hz, keep, fs=SR, output="sos"), sound)


def narrow_band(sound, hz, width_hz):
    """Keeps the part of a sound near one pitch."""
    return filtered(sound, "band", [hz - width_hz / 2, hz + width_hz / 2])


def unit_level(sound):
    """Scales a sound to an average (rms) size of 1."""
    return sound / np.sqrt(np.mean(sound ** 2) + 1e-20)


def from_db(db):
    """Turns decibels into a number to multiply by."""
    return 10 ** (np.asarray(db) / 20)


def scene():
    """The shed until the cut, then the blasting with its stray grains."""
    after_cut = np.clip((TIME_S - CUT_S) / 0.0021, 0, 1)
    shed = rubbing() + knocks() + chirps() + motor_hum() + insect()
    return (1 - after_cut) * shed + after_cut * blasting() + grain_pops()


def record(dry):
    """The microphones lose deep bass and the highest treble; the volume dips just after loud peaks."""
    limit_db, recovery_db_per_s = -14, 90
    sound = filtered(dry, "high", 110, order=3)
    level_db = 20 * np.log10(uniform_filter1d(np.abs(sound).max(0), size=40) + 1e-9)
    fall_db = recovery_db_per_s * TIME_S
    held_db = np.maximum.accumulate(level_db + fall_db) - fall_db  # holds each peak, then lets go
    excess_db = np.maximum(held_db - limit_db, 0)
    dip_db = signal.lfilter([.02], [1, -.98], -.7 * excess_db)  # takes about a millisecond to act
    rounded = .92 * np.tanh(sound * from_db(dip_db) / .92)  # rounds off the tallest peaks
    return signal.sosfilt(signal.ellip(12, .5, 55, 15770, fs=SR, output="sos"), rounded)


dry = scene()
out = record(dry)
transcribe(out)
```